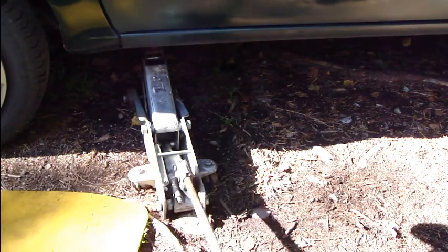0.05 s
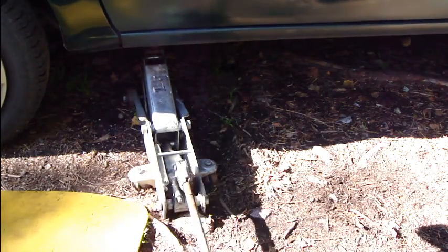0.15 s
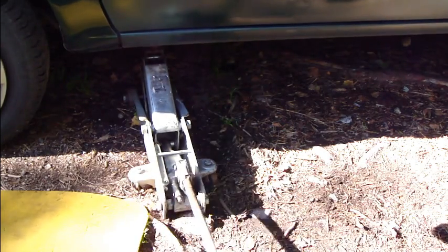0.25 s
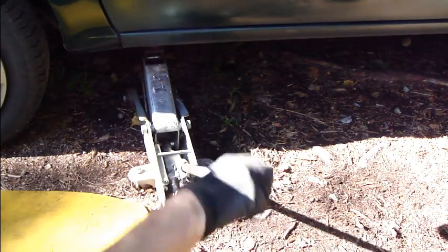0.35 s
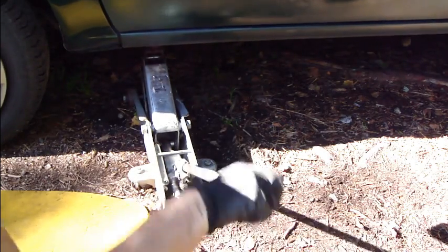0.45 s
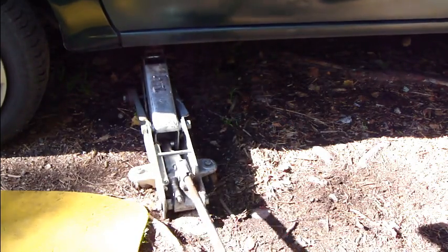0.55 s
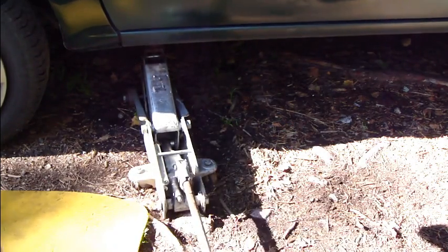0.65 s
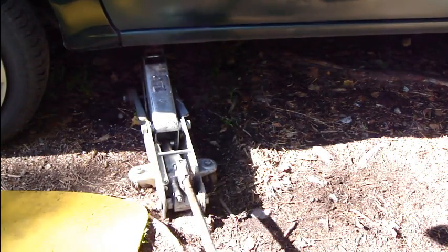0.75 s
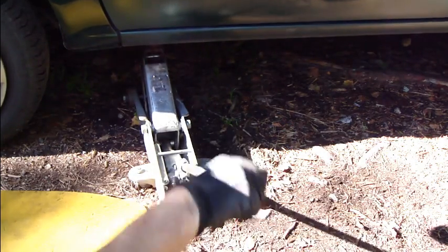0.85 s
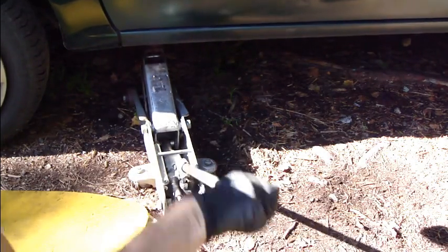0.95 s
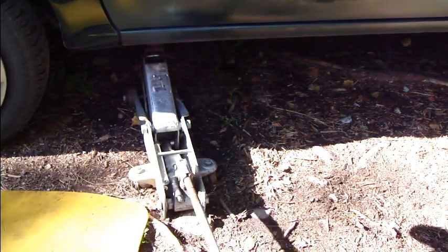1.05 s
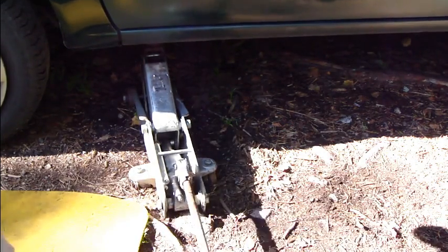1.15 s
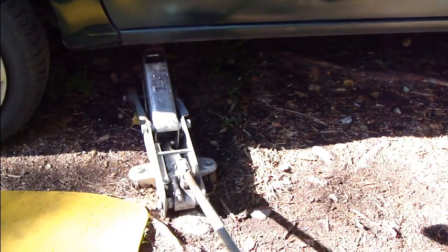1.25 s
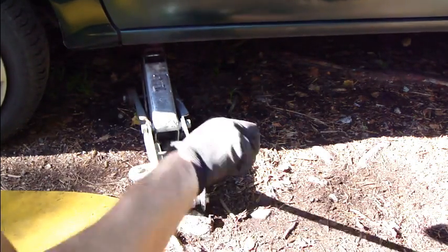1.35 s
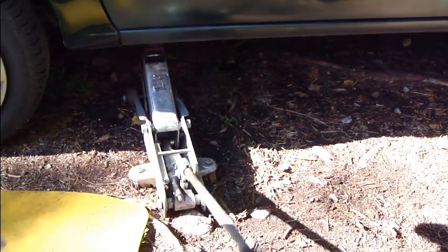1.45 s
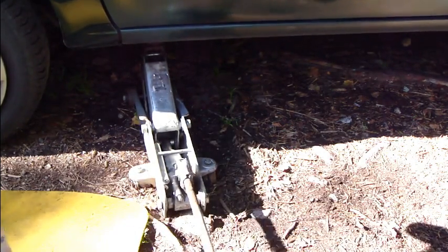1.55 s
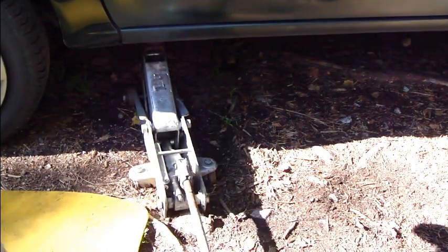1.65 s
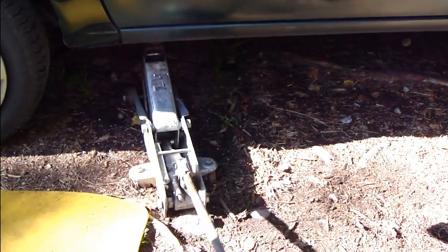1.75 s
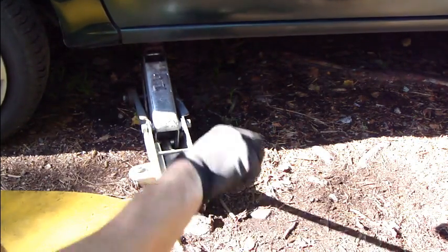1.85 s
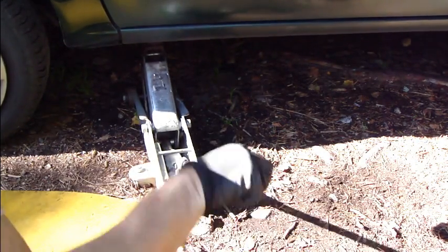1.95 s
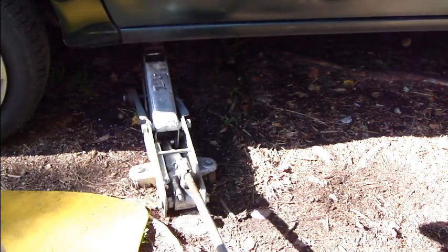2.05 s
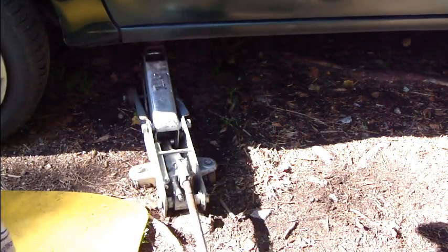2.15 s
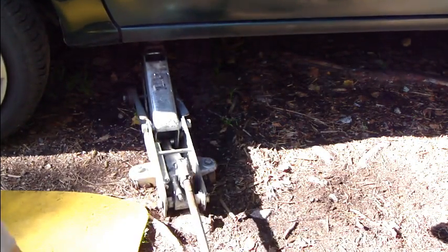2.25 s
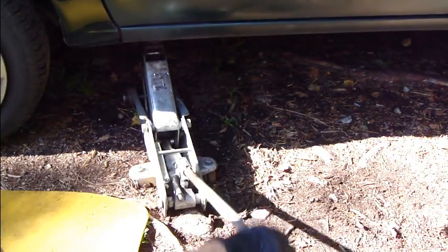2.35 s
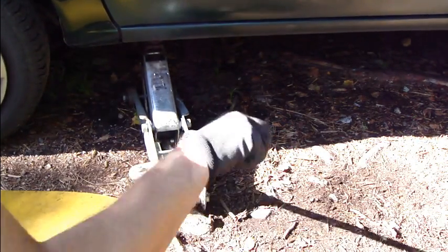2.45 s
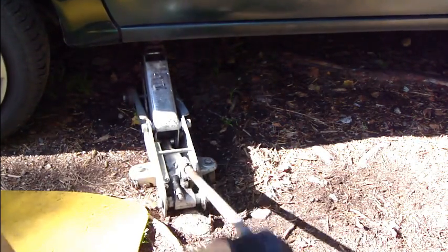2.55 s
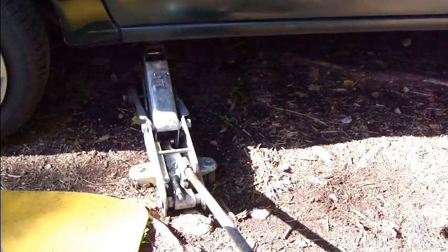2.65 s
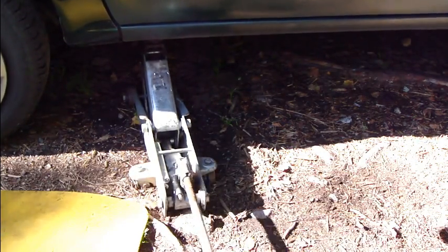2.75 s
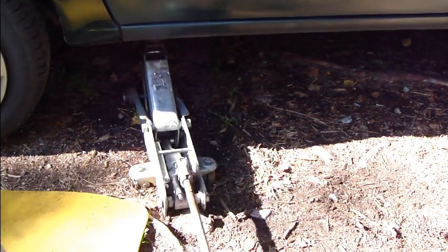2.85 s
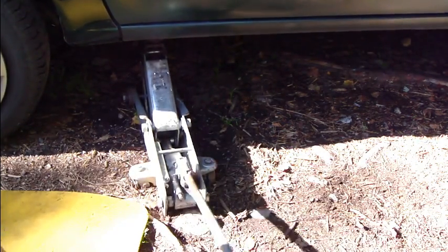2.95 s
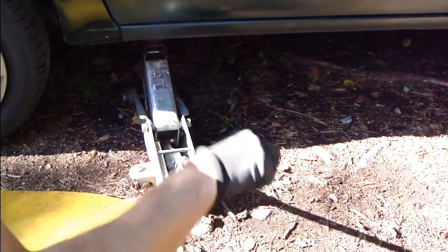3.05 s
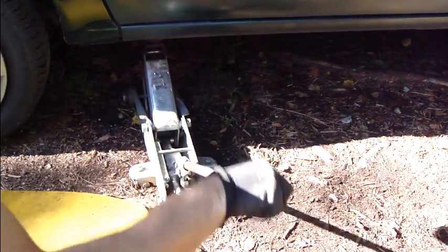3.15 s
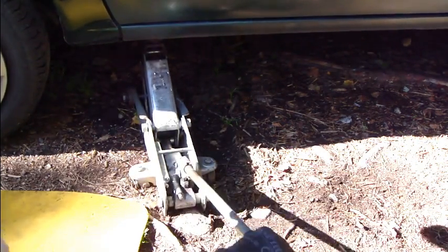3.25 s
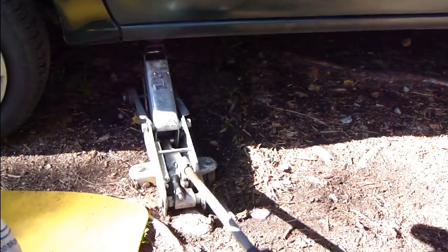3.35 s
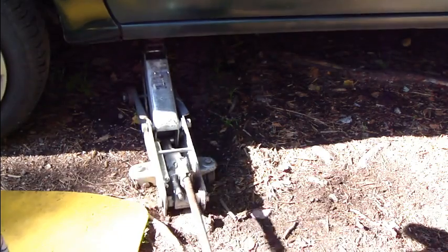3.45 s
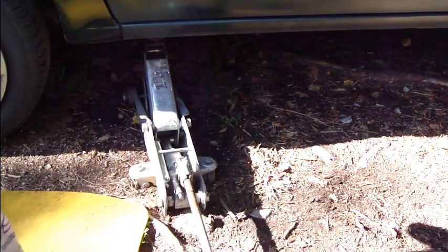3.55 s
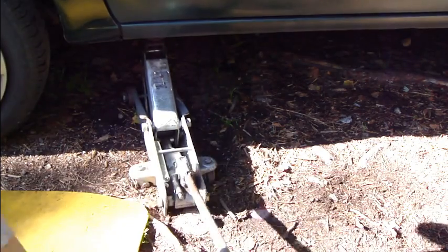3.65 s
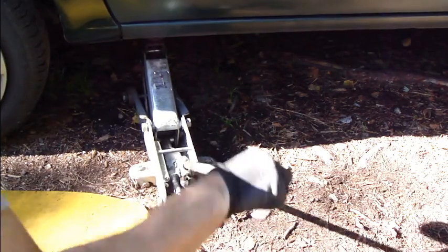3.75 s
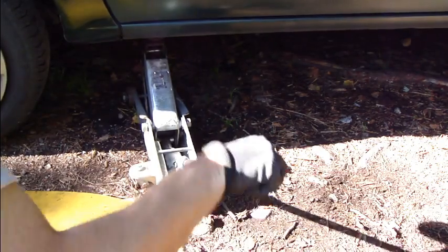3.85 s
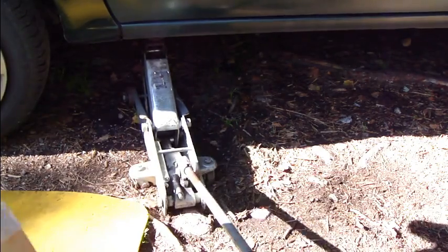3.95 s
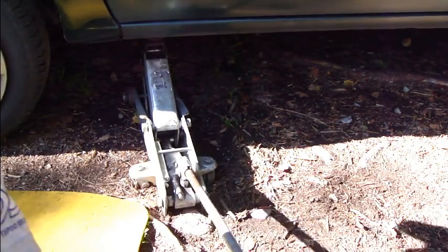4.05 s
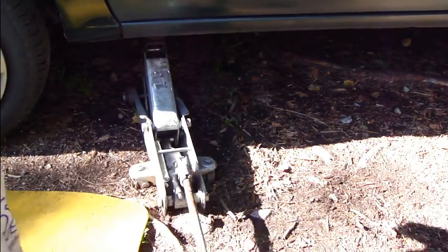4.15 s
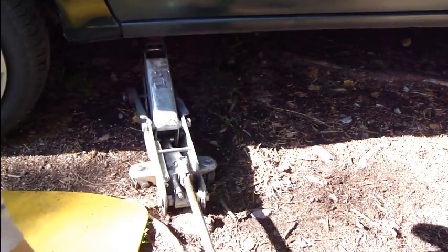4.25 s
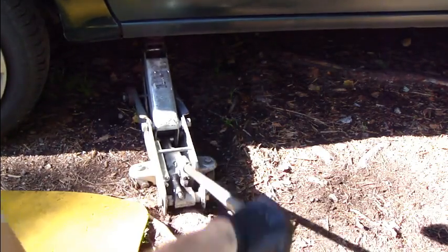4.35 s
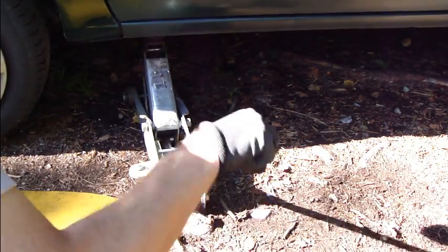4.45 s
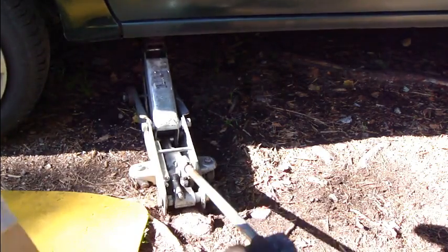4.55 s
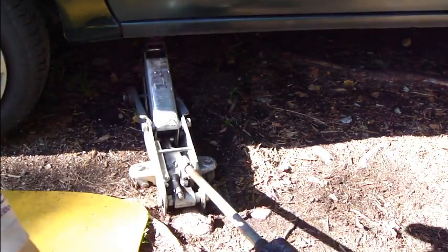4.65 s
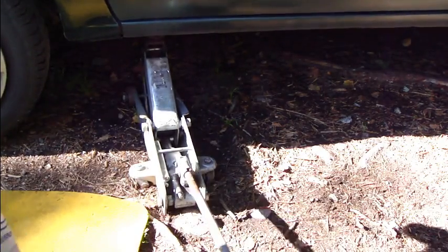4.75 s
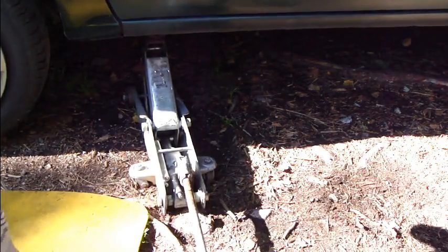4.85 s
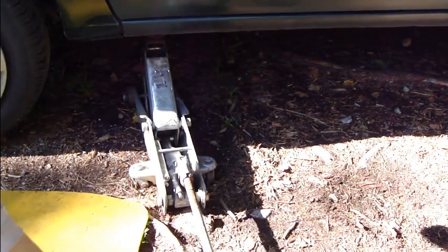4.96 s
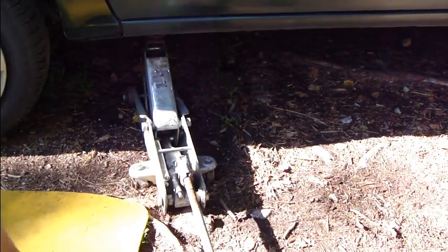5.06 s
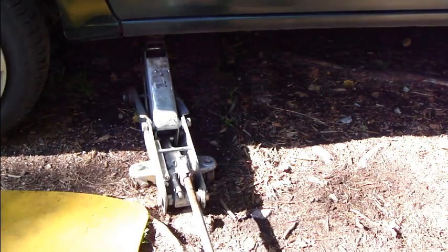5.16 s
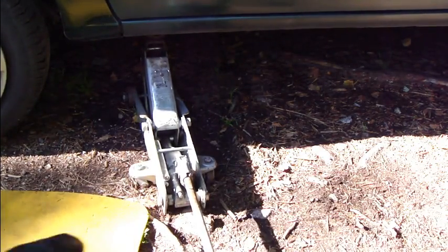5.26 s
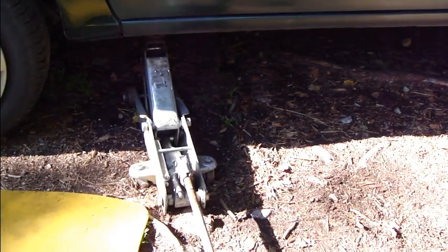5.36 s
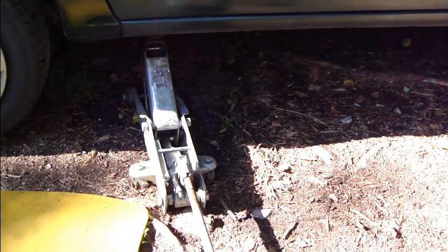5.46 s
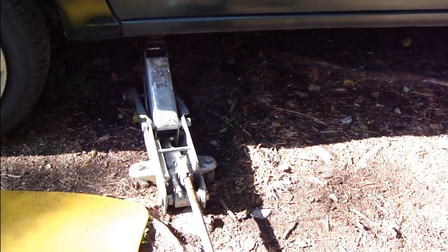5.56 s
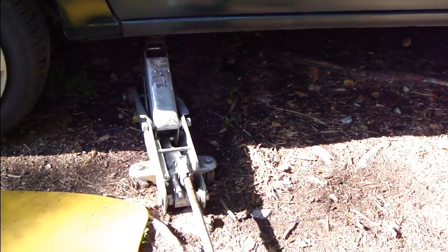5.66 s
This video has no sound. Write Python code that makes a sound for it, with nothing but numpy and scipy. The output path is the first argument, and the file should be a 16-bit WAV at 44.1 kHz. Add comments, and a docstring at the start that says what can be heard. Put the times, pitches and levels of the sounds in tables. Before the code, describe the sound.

A close stereo pickup of a steel trolley jack being pumped on dirt beside a car, slightly left of centre. The first slam is already under way at 0 s; others follow near 0.44, 0.94, 1.43, 1.96, 2.49, 3.13, 3.85 and 4.52 s, so the pace eases from two strokes a second to about one every 0.7 s. Before most slams the handle ticks in its socket; then comes a hard, bright clank, a brief gritty slide, and about 0.07 s later a clack with a low, muffled thud. Between strokes the handle clicks and the linkage scrapes, snaps and rattles with small clinks. A thin metallic ring lingers faintly. Last return activity fades by about 4.95 s; a faint, wavering squeak comes at 5.1 s, and a soft sleeve rustle peaks near 5.45 s. Quiet outdoor air rushes throughout, with a short, dull echo from car and ground.

```python
"""A dirt drive: a steel trolley jack is pumped with nine down-strokes, close to a pair of microphones.
Its loose handle ticks in its socket, slams against it, slides and hits its stop with a thud; on the way
back the linkage scrapes and rattles. Noise-like contact forces excite damped steel modes; the frame rings
on over a quiet outdoor rush of filtered noise. A squeak follows, and a sleeve rustles at the end."""
import sys
import numpy as np
from scipy import signal
from scipy.fft import rfft, irfft, next_fast_len
from scipy.io import wavfile
from scipy.ndimage import uniform_filter1d, minimum_filter1d, map_coordinates

SR = 44100
rng = np.random.default_rng(int(sys.argv[2]) if len(sys.argv) > 2 else 0)


def wav_out(sig):
    """Save sig, one row per channel (or a flat mono array), as 16-bit PCM at SR to the path in sys.argv[1]."""
    wavfile.write(sys.argv[1], SR, np.round(np.clip(np.atleast_2d(sig).T, -1, 1) * 32767).astype(np.int16))


N = 250929
T = np.arange(SR // 6) / SR  # time axis of one contact (s)

# The handle slams home and slides down to its stop:
# slam_s, stop_s, slam_db, slam_knock_db, slide_db, catch_db, stop_db, stop_sizzle_db, seat_db, thud_db,
# held_note_db
DOWN_STROKES = [(-.045, 0.0184, -3, -2, -20.5, -10, -5.5, -1, -7, -21, -31),
                (0.438, 0.5054, -3.5, 5.5, -18.5, -16, -9, 1.5, -10.5, -22, -32),
                (.9403, 1.0023, -2.5, 0.5, -18, -9.5, -10, 1.5, -9.5, -19, -27.5),
                (1.4313, 1.5017, -2.5, 4, -17.5, -7, -6.5, 0, -12, -18.5, -25),
                (1.9598, 2.025, -3, 0, -18.5, -4.5, -3.5, 0.5, -12, -21, -27),
                (2.493, 2.564, -0.5, -0.5, -24, -28, -1.5, -7, -6.5, -19, -24.5),
                (3.1294, 3.2008, -3.5, 2, -28.5, -17, 6, -3, -18, -31, -31),
                (3.8456, 3.933, -3, 3.5, -21.5, -8, -4.5, 2, -11, -27, -28.5),
                (4.5198, 4.5912, -4, 0, -19.5, -26, -9.5, 6, -10, -25.5, -34.5)]
# Before a push the handle swings across the play in its socket: swing_s, level_db, sizzle_db
HANDLE_SWINGS = [(.3965, -6.5, -0.5), (0.8964, -13, -13), (1.3952, -8, 1), (1.913, -9, -15.5),
                 (2.4527, -7, -0.5), (3.0919, -6.5, 2), (3.8055, -9, -9), (4.4764, -11, -16)]
# The linkage takes up its slack, drags, breaks loose and snaps free:
# take_up_s, slip_s, snap_s, take_up_db, slip_db, snap_db, scrape_db
RETURN_PULLS = [(0.203, 0.2395, .286, -16, -8.5, -16.5, -37), (0.7084, 0.7452, .7735, -6.5, -7.5, -33, -37),
                (1.2051, 1.2348, 1.271, -14, -7, -11.5, -31.5),
                (1.7282, 1.756, 1.8004, -10.5, -6.5, -16.5, -31.5),
                (2.2544, 2.2852, 2.3334, -16.5, -5, -14.5, -32.5),
                (2.8985, 2.9255, 2.9595, -2.5, -8.5, -13, -38), (3.6, 3.634, 3.6866, -11, -11, -16, -35.5),
                (4.2777, 4.3003, 4.338, -13.5, -6.5, -15.5, -38)]
# Modes of the pump linkage: frequency_hz, level_db, t60_s
LINKAGE_MODES = [(1530, -21, .09), (2550, -12, .025), (2850, -13, .02), (3120, -11, .035),
                 (3340, -17, .075), (3650, -6, .035), (4960, -15, .05), (6300, -22, .06), (6480, -22, .05),
                 (8460, -16, .06), (8950, -22, .05), (9790, -18, .06), (10300, -17, .05), (10600, -7, .045)]


def amp(db):
    """Decibel law: a level in dB becomes an amplitude ratio."""
    return 10 ** (np.asarray(db) / 20)


def unit(x):
    """Normalisation: x scaled to an rms of 1."""
    return x / np.sqrt(np.mean(x ** 2) + 1e-20)


def along(points, hz):
    """Interpolation of (frequency_hz, value) points on a logarithmic frequency axis."""
    point_hz, value = np.transpose(points)
    return np.interp(np.log(hz + 1), np.log(point_hz + 1), value)


def filtered(x, response):
    """Linear filtering: the spectrum of x is multiplied by a response of frequency."""
    size = next_fast_len(x.shape[-1] + 8192)
    spectrum = rfft(x, size) * response(np.fft.rfftfreq(size, 1 / SR))
    return irfft(spectrum, size)[..., :x.shape[-1]]


def band(x, low_hz, high_hz):
    """Band limitation by a causal Butterworth band-pass."""
    sos = signal.butter(3, [low_hz, min(high_hz, .45 * SR)], 'band', fs=SR, output='sos')
    return signal.sosfilt(sos, x)


def add(track, s, sound):
    """Superposition: a sound is added to a track from time s on."""
    start = round(s * SR)
    part = sound[:, max(-start, 0):N - start]
    track[:, max(start, 0):][:, :part.shape[1]] += part


def uneven(t, rate, points):
    """Random fluctuation: a smooth curve through `points` random values, `rate` of them per second."""
    return map_coordinates(rng.standard_normal(points), [t * rate], mode='wrap')


def pair(size, apart):
    """Partial coherence: white noise at two microphones, partly different at each."""
    return rng.standard_normal(size) + apart * rng.standard_normal((2, size))


def ring(modes, t):
    """Modal decay: damped modes of random strength, with own level and phase at each microphone."""
    hz, db, t60 = np.transpose(modes)
    common_db, own_db = 1.5 * rng.standard_normal(len(hz)), 1.5 * rng.standard_normal((2, len(hz)))
    strength = amp(db + common_db + own_db)
    phase = rng.uniform(0, 2 * np.pi, len(hz)) + .5 * rng.standard_normal((2, len(hz)))
    waves = np.exp(np.outer(2j * np.pi * hz - np.log(1000) / t60, t))
    return np.imag((strength * np.exp(1j * phase)) @ waves)


def steel(modes, ring_db, crack_t60):
    """Impulse response of a steel part: a crack of dense, short modes and a few clear ones."""
    crack = pair(len(T), apart=0.71) * amp(-60 * T / crack_t60)
    return crack + amp(ring_db) * ring(modes, T)


def contacts(rows, modes, ring_db, crack_t60, chatter_s, chatter_db, lead_db,
             knock_db, clink_db, sizzle_db, hardening=0.58):
    """Impact excitation: each contact grazes in, taps and rebounds in a flurry that drives the modes.

    Columns of rows: contact_s, level_db, knock_db (low ringing), sizzle_db (high ringing)."""
    contact_s, level_db, knock, sizzle = np.transpose(rows)
    lead = T[round(.012 * SR)]  # grazing time ahead of the tap (s)
    t = T - lead
    after = np.maximum(t, 0)
    graze = (t < 0) * np.exp(-np.abs(t) / .0015)
    hits = []
    for brightness in np.maximum(sizzle + 6, 0):
        brevity = amp(-hardening * brightness)  # bright, hard contacts are over sooner
        flurry = after * np.exp(-after / (chatter_s * brevity))
        grit = rng.standard_normal(len(t)) ** 3
        force = 1. * (t == 0)
        for shape, share_db in [(graze, lead_db), (flurry, chatter_db)]:
            burst = grit * shape
            force = force + amp(share_db) * burst / np.linalg.norm(burst)
        answer = steel(modes, ring_db - hardening * brightness, crack_t60 * brevity)
        hits.append(signal.fftconvolve(force[None], answer, axes=1)[:, :len(t)])
    hits = np.array(hits)
    sounds = 0
    # knock, clink and sizzle bands, each set to its own peak level
    for low_hz, high_hz, share_db in [(800, 2500, knock + knock_db), (2500, 4900, clink_db),
                                      (6200, 11800, sizzle + sizzle_db)]:
        part = band(hits, low_hz, high_hz)
        power = uniform_filter1d(part.mean(axis=1) ** 2, size=128)
        peak = np.sqrt(power.max(axis=1))
        sounds = sounds + part * (amp(level_db + share_db) / peak)[:, None, None]
    track = np.zeros((2, N))
    for s, sound in zip(contact_s, sounds):
        add(track, s - lead, sound)
    return track


def friction(rows, modes, ring_db, grit_db, grit_rate, edge_s, colour):
    """Friction excitation: sliding steel catches in uneven little slips that keep its modes ringing.

    Columns of rows: start_s, end_s, level_db; of colour: frequency_hz, gain_db."""
    track = np.zeros((2, N))
    for start, end, db in rows:
        t = np.arange(max(round((end - start) * SR), SR // 100)) / SR
        grit = uneven(t, grit_rate, 256)
        stroke = np.clip(np.minimum(t, t[-1] - t) / edge_s, 0, 1)
        slips = rng.standard_normal(SR // 4)[:len(t)] * amp(grit_db * grit) * stroke
        ringing = signal.fftconvolve(slips[None], steel(modes, ring_db, crack_t60=0.032), axes=1)
        sound = filtered(ringing, lambda hz: amp(along(colour, hz)))
        add(track, start, amp(db) * sound / sound[:, :len(t)].std())
    return track


def taps(pattern, s, db, sizzle_db=0):
    """Contact sequence: one movement at time s gives several delayed contacts."""
    return [(s + delay, db + level, knock, sizzle + sizzle_db) for delay, level, knock, sizzle in pattern]


def handle_clacks():
    """Play in a joint: the handle swings, catches, stops, seats, is lifted and falls back."""
    # A light touch, then a clack: delay_s, level_db, knock_db, sizzle_db
    swing_taps = [(-.0245, -6, -10.5, -17.5), (0, 2, -12.5, -4.5)]
    # A click as the handle is lifted, then its fall to the far side of the socket: click_s, fall_s, click_db
    lifts = [(0.116, 0.159, -8.5), (0.618, 0.663, -23), (1.1197, 1.153, -14), (1.6172, 1.674, -30),
             (2.154, 2.204, -12.5), (2.809, 2.8514, -19.5), (3.5002, 3.5447, -7), (4.1843, 4.221, -14.5),
             (4.8634, 4.922, -31.5)]
    # A faint tick, then the click: delay_s, level_db, knock_db, sizzle_db
    lift_taps = [(-.0195, -10, -15, -3), (0, 0, -10, 0)]
    # Dull bounces off the stop on the slower strokes: bounce_s, level_db
    bounces = [(2.6449, -23), (3.2983, -36.5), (4.0127, -26.5), (4.6758, -29)]
    rows = []
    for s, db, sizzle_db in HANDLE_SWINGS:
        rows += taps(swing_taps, s, db, sizzle_db)
    # each row: contact_s, level_db, knock_db, sizzle_db
    for _, stop, _, _, _, catch_db, stop_db, stop_sizzle_db, seat_db, _, _ in DOWN_STROKES:
        rows.append((stop - .016, catch_db, -12, -6))
        rows.append((stop, stop_db, -15, stop_sizzle_db))
        rows.append((stop + .0085, seat_db, -2.5, -2.5))
    for click, fall, click_db in lifts:
        rows += taps(lift_taps, click, click_db)
        rows.append((fall, -23, 0, -15))  # always a soft, dull tap
    for s, db in bounces:
        rows.append((s, db, 6, -8))  # mostly knock
    return rows


def down_stroke():
    """Impact and sliding friction: the handle takes up its play, slams home and slides to its stop."""
    # Modes of the handle tube and socket: frequency_hz, level_db, t60_s
    handle_modes = [(750, -23, .1), (990, -12, .04), (1255, -10, .05), (1430, -13, .03), (1525, -18, .06),
                    (1900, -16, .03), (2148, -17, .1), (2400, -9, .015), (2650, -10, .03), (3065, -23, .06),
                    (3900, 0, .022), (4160, 0, .028), (4450, -3, .02), (5010, -17, .06), (6288, -22, .07),
                    (8085, -9, .08), (8500, -19, .03), (8670, -24, .1), (9650, -18, .05), (9810, -14, .06),
                    (10600, -11, .065)]
    blows, slides = [], []
    for slam, stop, slam_db, knock_db, slide_db, *_ in DOWN_STROKES:
        blows.append((slam, slam_db, knock_db, -14))
        slides.append((slam + .018, stop + .0085, slide_db))  # until the handle seats
    slams = contacts(blows, handle_modes, ring_db=2, crack_t60=.04, chatter_s=0.00021, chatter_db=-1.5,
                     lead_db=-14.5, knock_db=-10.5, clink_db=-3.5, sizzle_db=6.5)
    clacks = contacts(handle_clacks(), handle_modes, ring_db=-15.5, crack_t60=0.037, chatter_s=0.00037,
                      chatter_db=23, lead_db=10, knock_db=-4, clink_db=-9, sizzle_db=-7.5)
    slide = friction(slides, handle_modes, ring_db=-6.5, grit_db=9.5, grit_rate=241, edge_s=0.0066,
                     colour=[(60, -43), (200, -34), (400, -9.0), (700, 2), (1500, -6.5), (3200, 8.5),
                             (4200, -6.5), (8000, 3), (9600, 9), (11000, 6.5), (13000, -62)])
    return slams + clacks + slide


def note(pitch_hz=2147, rise_s=.005, damped_t60=0.041, beat_hz=5, twin_db=-13, free_db=-8.5, free_t60=1.5):
    """Damping and beats: one note sings until the stop damps it to a faint ring beating with a weak twin."""
    track, t = np.zeros((2, N)), np.arange(SR) / SR
    for slam, stop, *_, held_db in DOWN_STROKES:
        since_stop = np.maximum(t - (stop - slam), 0)
        damped = -60 * since_stop / damped_t60
        free = free_db - 60 * since_stop / free_t60  # relative to the held note
        level = amp(held_db + np.maximum(damped, free))
        phase = 2 * np.pi * (pitch_hz * t + rng.uniform())
        twin = amp(twin_db) * np.sin(phase + 2 * np.pi * beat_hz * t)
        tone = (np.sin(phase) + twin) * level * (1 - np.exp(-t / rise_s))
        add(track, slam, np.array([tone, tone]))
    return track


def thuds():
    """Load transfer: the chassis is nudged at each stop, lightly at each swing and now and then between."""
    # The chassis settles on the ground between pushes: thud_s, level_db
    settling = [(.315, -25), (.714, -29.5), (4.923, -46), (5.109, -36)]
    stops = [(stop + .011, thud_db) for _, stop, *_, thud_db, _ in DOWN_STROKES]
    swings = [(s + 0.00724, db - 20) for s, db, _ in HANDLE_SWINGS]
    return stops + swings + list(settling)


def frame(thud_db=-9, soil_db=-11, bump_db=-27, rumble_db=-40, rise_s=0.00047):
    """Modal ringing and soil damping: slams set the frame singing, the shifting load thumps the chassis."""
    # Long modes of the frame: frequency_hz, level_db, t60_s
    frame_modes = [(437, -24, .6), (740, -8, .2), (900, -14, .15), (1255, -20, .55), (1370, -17.5, .7),
                   (1540, -18, .55), (1860, -23, .7), (2562, -23, .6), (2900, -21, .7), (3045, -19, .6)]
    # Modes of the chassis, before each thud shifts its time scale: frequency_hz, level_db, t60_s
    chassis_modes = [(175.7, -9, 0.11), (250.5, -7, 0.11), (445.4, 0, 0.11), (509, 0, 0.1),
                     (593.6, 6, 0.059), (647, 2, 0.08)]
    scatter, glide, glide_s = .04, .3, .012
    track, t = np.zeros((2, N)), np.arange(SR) / SR
    swell = 1 - np.exp(-t / rise_s)
    for slam, *_ in DOWN_STROKES:
        add(track, slam, amp(-19) * ring(frame_modes, t) * swell)
        bump = unit(band(pair(len(T), apart=0.13), 137, 1300))
        add(track, slam, amp(bump_db) * bump * amp(-60 * T / 0.02))
    for s, db in thuds():
        soil = amp(soil_db - 60 * t / .1) * unit(band(pair(SR, apart=0.15), 332, 730))
        rumble = amp(rumble_db - 60 * t / 0.38) * unit(band(pair(SR, apart=0.73), 6, 76))
        # each thud has its own pitch, starts higher and sinks as the soil gives
        pitch_ratio = 1 + scatter * rng.standard_normal()
        sinking = pitch_ratio * (t + glide * glide_s * (1 - np.exp(-t / glide_s)))
        chassis = amp(thud_db) * ring(chassis_modes, sinking)
        add(track, s, amp(db) * (chassis + soil + rumble) * swell)
    return track


def yard(x, delay_s=0.0065):
    """Diffuse reflection: the car's side and the ground scatter a short, dull echo."""
    # Decay time of the echo: frequency_hz, t60_s
    decay = [(200, 0.28), (800, 0.18), (2500, 0.058), (10000, 0.27)]
    # Colour of the echo: frequency_hz, gain_db
    echo_colour = [(150, -9.5), (450, 13), (900, -1), (2500, 0.5), (10000, -17.5)]
    hz, t, z = signal.stft(rng.standard_normal((2, SR // 2)), SR, nperseg=256)
    fading = z * amp(-60 * t / along(decay, hz)[:, None])
    tail = signal.istft(fading, SR, nperseg=256)[1]
    tail = np.pad(tail / np.linalg.norm(tail[0]), ((0, 0), (round(delay_s * SR), 0)))
    echo = signal.fftconvolve(x.mean(axis=0)[None], tail, axes=1)[:, :N]
    return filtered(echo, lambda hz: amp(along(echo_colour, hz)))


def air(low_db=-6.5, hiss_db=-2.5, flutter_db=2.1, lean_db=1):
    """Broadband noise of low coherence: a quiet outdoor rush whose hiss swells and flutters."""
    # Spectrum shape of the rush: frequency_hz, relative_density_db
    spectrum = [(18, -79), (30, -24), (108, -18), (178, -8), (257, -9), (373, -6.5), (477, -9), (611, -4.5),
                (658, -8), (1110, -11.5), (6230, -23.5), (11000, -24.5), (14300, -90), (22000, -120)]
    # Course of the rush, before the overall levels low_db and hiss_db: time_s, murmur_db, hiss_db
    course = [(0, -34.5, -36.5), (1.5, -39, -38), (3, -37, -41), (4.602, -38, -41.5), (4.8, -35.5, -39.5),
              (5.0, -38.5, -40.5), (5.25, -38, -42.5), (5.69, -39.5, -39.5)]
    # Correlation between left and right: frequency_hz, correlation
    likeness = [(60, 0.027), (250, 0.011), (900, 0.028), (3000, 0.088), (10000, 0.02)]

    def mid_side(hz):
        """Splits the spectrum so that left and right have the given correlation."""
        turn = np.arccos(np.clip(along(likeness, hz), -1, 1)) / 2
        return amp(along(spectrum, hz)) * [np.cos(turn), np.sin(turn)]

    mid, side = filtered(rng.standard_normal((2, N)), mid_side)
    noise = np.array([mid + side, mid - side]) * amp([[lean_db], [-lean_db]])
    t = np.arange(N) / SR
    s, murmur_course, hiss_course = np.transpose(course)
    flutter = flutter_db * uneven(t, 40, 512)
    murmur = unit(band(noise, 20, 1700)) * amp(np.interp(t, s, murmur_course) + low_db)
    hiss = unit(band(noise, 1700, 12000)) * amp(np.interp(t, s, hiss_course) + hiss_db + flutter)
    return murmur + hiss


def linkage_rattles():
    """Slack in a linkage: on a return it knocks, slips, snaps free and clinks at the top."""
    # A slip catches, clinks, ticks brightly and clinks again: delay_s, level_db, knock_db, sizzle_db
    slip_taps = [(-.008, -6.5, -2, -23.5), (0, 2, -27, -8.5), (.0135, -15, -14, 13.5),
                 (.031, 1, -21.5, -12.5)]
    # Clinks at the top of the stroke: clink_s, level_db, knock_db, sizzle_db
    top_clinks = [(.3117, -11, -5, -30), (.8084, -10, -24, 1), (1.2924, -14, -15, 9.5),
                  (1.8203, -20, -8, -6), (2.3668, -16, -12, -25), (2.9966, -13, -13, -7),
                  (3.713, -21.5, -10, -30), (4.3795, -5, -35, -14.5)]
    rows = []
    for take_up, slip, snap, take_up_db, slip_db, snap_db, _ in RETURN_PULLS:
        rows.append((take_up, take_up_db, -7.5, -9.5))
        rows += taps(slip_taps, slip, slip_db)
        rows.append((snap, snap_db, -24, 7))
    return rows + list(top_clinks)


def scrapes():
    """Stick and slip: drag from just before a slip to just after the snap (start_s, end_s, level_db)."""
    return [(slip - .01, snap + .016, db) for _, slip, snap, *_, db in RETURN_PULLS]


def return_stroke():
    """Impact and friction: the linkage rattles and drags on the way back."""
    rattles = contacts(linkage_rattles(), LINKAGE_MODES, ring_db=5.5, crack_t60=0.032, chatter_s=0.0005,
                       chatter_db=-1.0, lead_db=-2.0, knock_db=-5, clink_db=-8.5, sizzle_db=-7.0)
    scrape = friction(scrapes(), LINKAGE_MODES, ring_db=0.0, grit_db=8.0, grit_rate=193.3, edge_s=0.006,
                      colour=[(60, -42), (200, -39), (400, 6.5), (1200, 10.5), (3000, 7.5),
                              (5800, -11), (8500, -6.5), (10800, -3.5), (13000, -57)])
    return rattles + scrape


def loose_pins(count=6, level_db=-19, spread_db=1.5, knock_db=-9, sizzle_db=-5):
    """Irregular impacts: while the linkage drags, its slack pivot pins chatter at an uneven pace."""
    rows = []
    for start, end, _ in scrapes():
        times = start + (end - start) * (np.arange(count) + rng.uniform(size=count)) / count
        for s, (size, bright) in zip(times, rng.standard_normal((count, 2))):
            rows.append((s, level_db + spread_db * size, knock_db, spread_db * bright + sizzle_db))
    return contacts(rows, LINKAGE_MODES, ring_db=-2, crack_t60=0.02, chatter_s=0.0007, chatter_db=9,
                    lead_db=0, knock_db=-5, clink_db=-6, sizzle_db=-6)


def squeak(start_s=5.09, length_s=0.11, pitch_hz=1750, glide_hz=45, level_db=-47):
    """Frequency modulation: a faint, wavering, slightly rising squeak after the last stroke."""
    t = np.arange(round(length_s * SR)) / SR
    waver_hz = 18 * uneven(t, 120, 64)
    phase = 2 * np.pi * np.cumsum(pitch_hz + glide_hz * t / length_s + waver_hz) / SR
    tone = amp(level_db) * np.sin(phase) * np.sin(np.pi * t / length_s)
    track = np.zeros((2, N))
    add(track, start_s, np.tile(tone, (2, 1)))
    return track


def rustle(grain_db=3, grain_rate=300):
    """Granular friction noise: a sleeve rustles softly as the arm moves away."""
    # Level of the shifting cloth: time_s, level_db
    swell = [(5.25, -67), (5.38, -45), (5.43, -42), (5.455, -35.5), (5.48, -40.5), (5.6, -48.5),
             (5.69, -57)]
    # Spectrum shape of the cloth: frequency_hz, relative_density_db
    cloth_colour = [(100, -28), (600, -1), (2000, -0.5), (3500, 3.5), (5500, -3), (11000, -11.5),
                    (13000, -42)]
    t = np.arange(N) / SR
    grain = uneven(t, grain_rate, 4096)
    cloth = filtered(pair(N, apart=1) * amp(grain_db * grain), lambda hz: amp(along(cloth_colour, hz)))
    return unit(cloth) * amp(np.interp(t, *np.transpose(swell)))


def scene():
    """Interchannel level difference: the jack stands a little to the left, amid its echo and the air."""
    # Level difference of the direct sound: frequency_hz, left_minus_right_db
    lean = [(100, 16), (500, 9), (1100, 2.5), (2200, 10.5), (4000, 1.1), (8000, 2), (11000, 4)]
    jack = down_stroke() + return_stroke() + loose_pins() + frame() + note()
    direct = filtered(jack, lambda hz: amp(np.outer([.5, -.5], along(lean, hz))))
    return direct + amp(-6) * yard(jack) + air() + squeak() + rustle()


def record(dry, ceiling=1.0, top_hz=10950):
    """Limiting and band limitation: a fast gain holds down the highest peaks before a steep low-pass."""
    needed = np.minimum(1, ceiling / (np.abs(dry) + 1e-9))
    gain = uniform_filter1d(minimum_filter1d(needed, size=65), size=65)
    return filtered(dry * gain, lambda hz: 1 / np.sqrt(1 + (hz / top_hz) ** 110))


dry = scene()
out = record(dry)
wav_out(out)
```